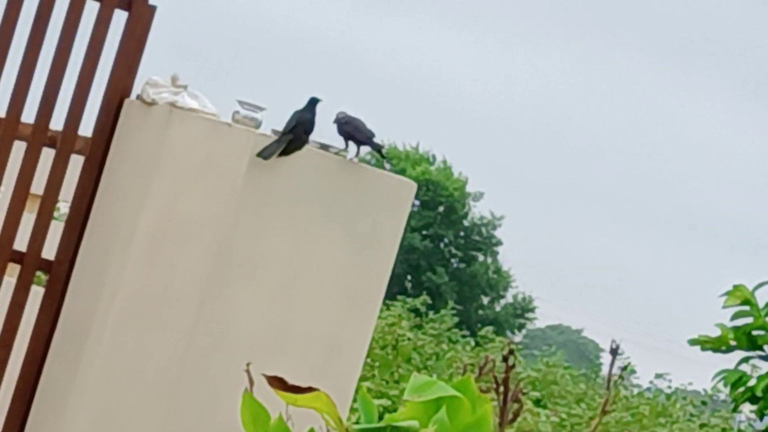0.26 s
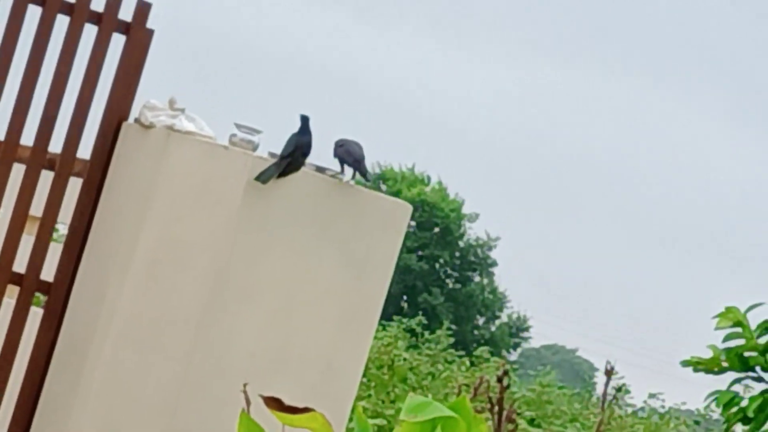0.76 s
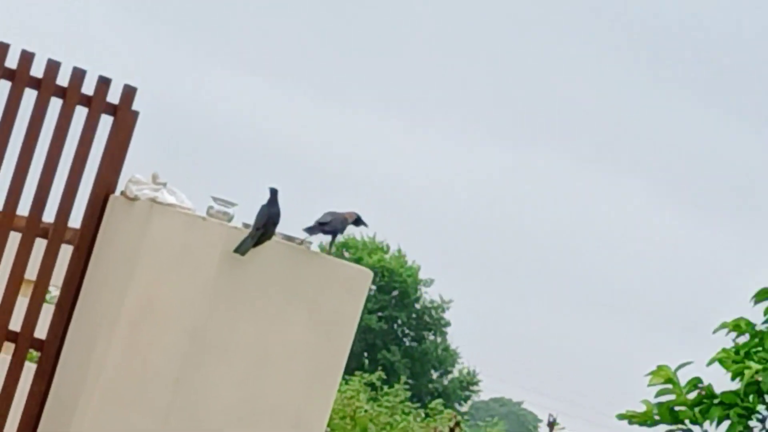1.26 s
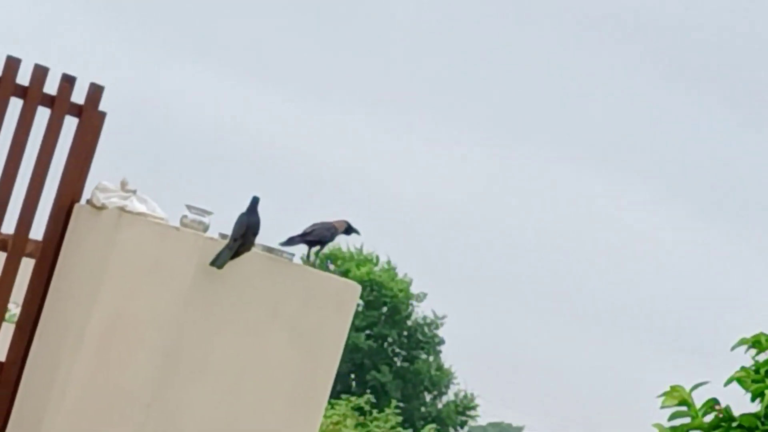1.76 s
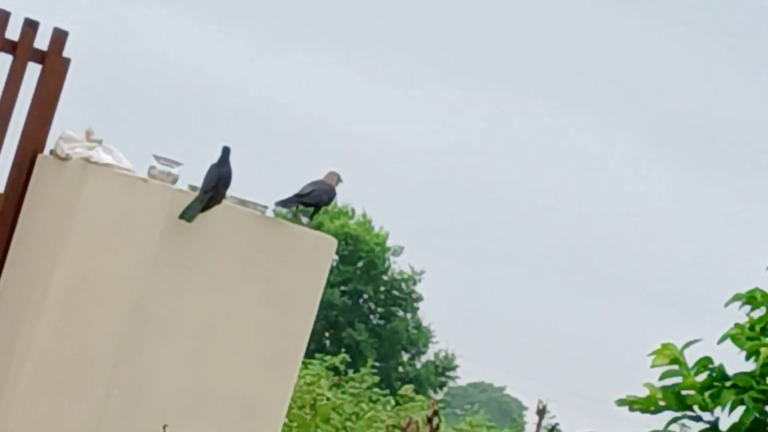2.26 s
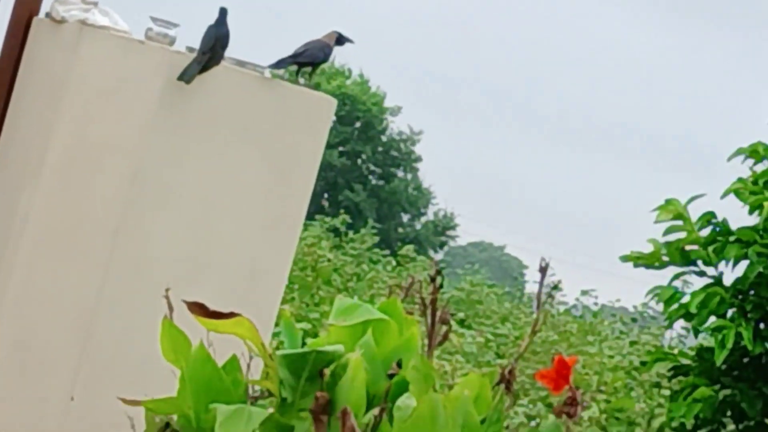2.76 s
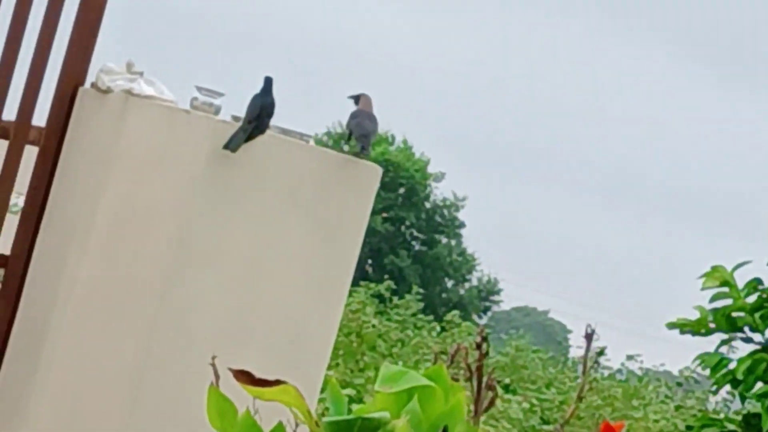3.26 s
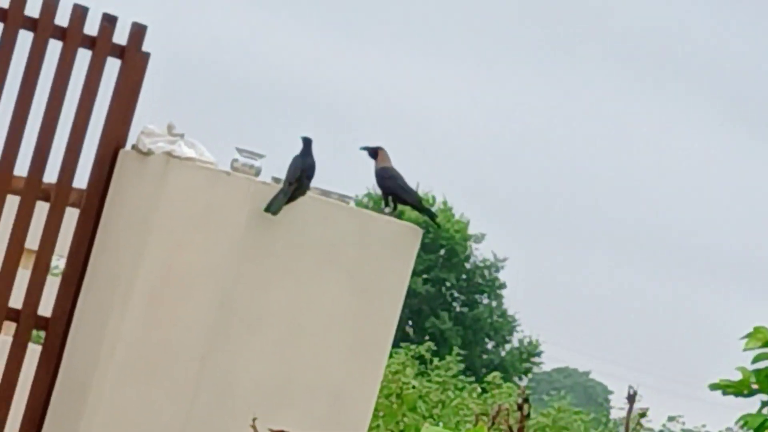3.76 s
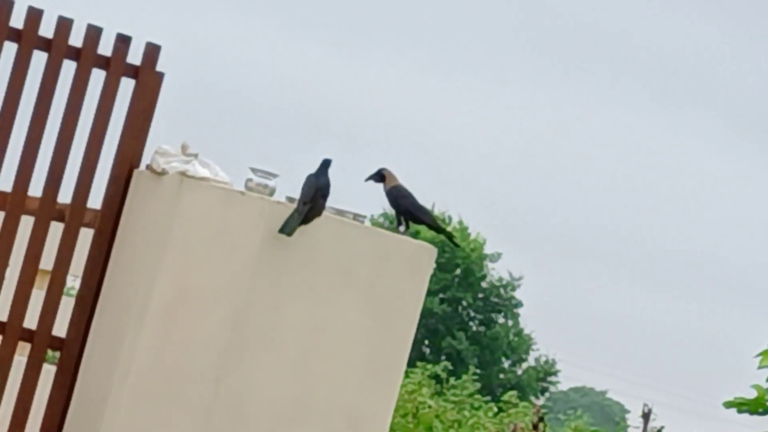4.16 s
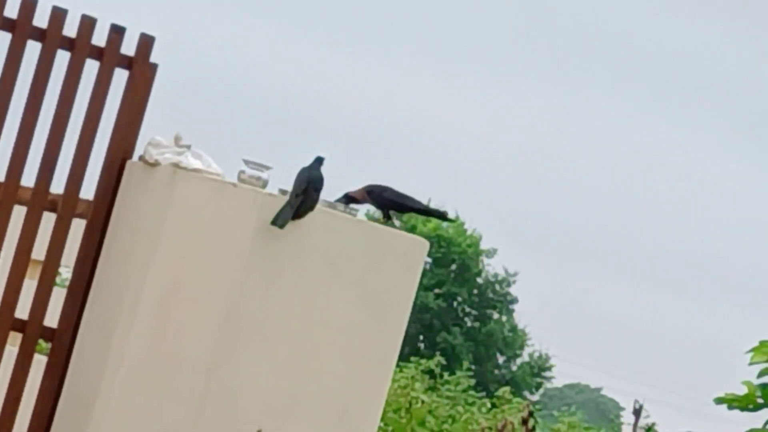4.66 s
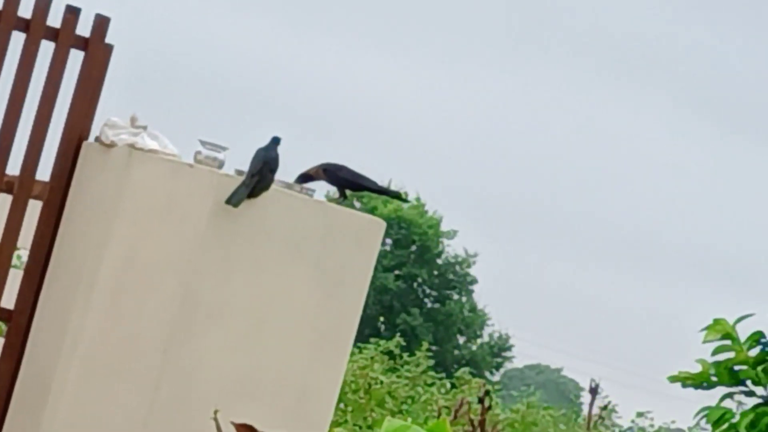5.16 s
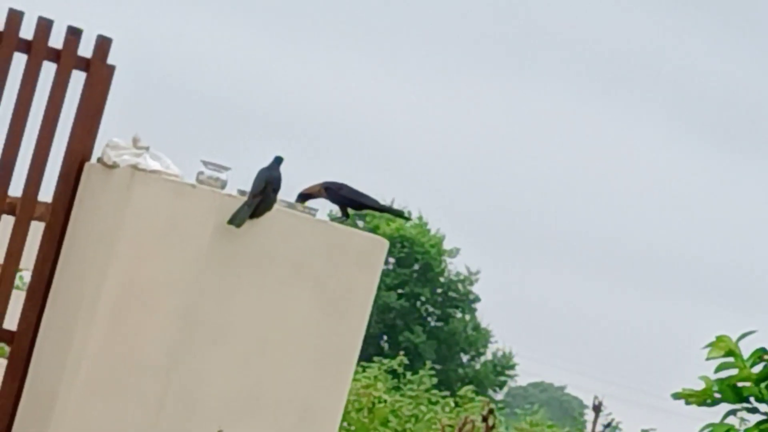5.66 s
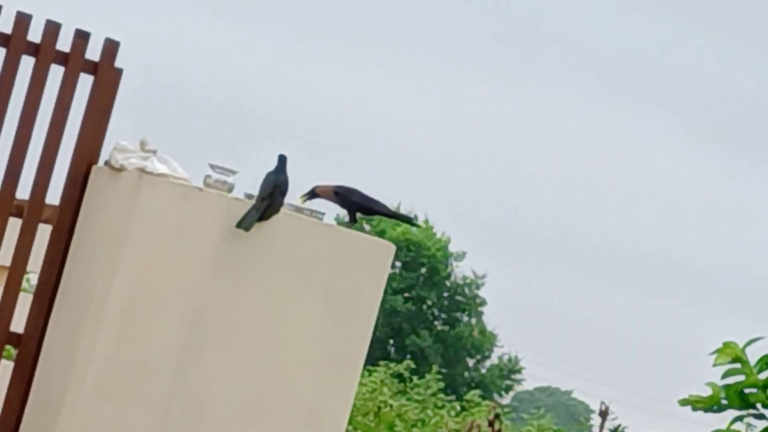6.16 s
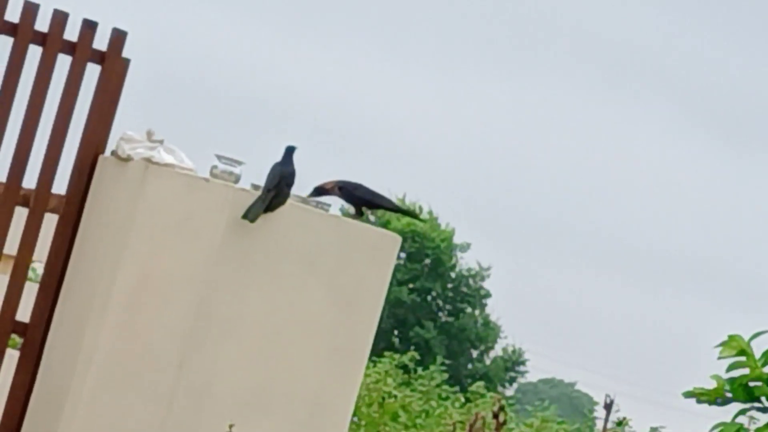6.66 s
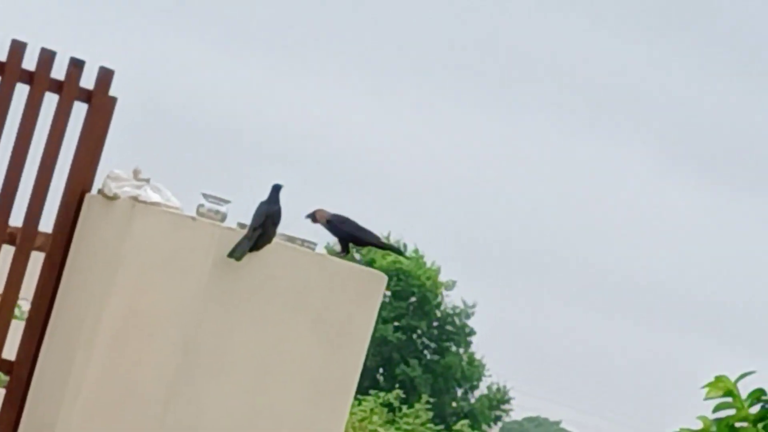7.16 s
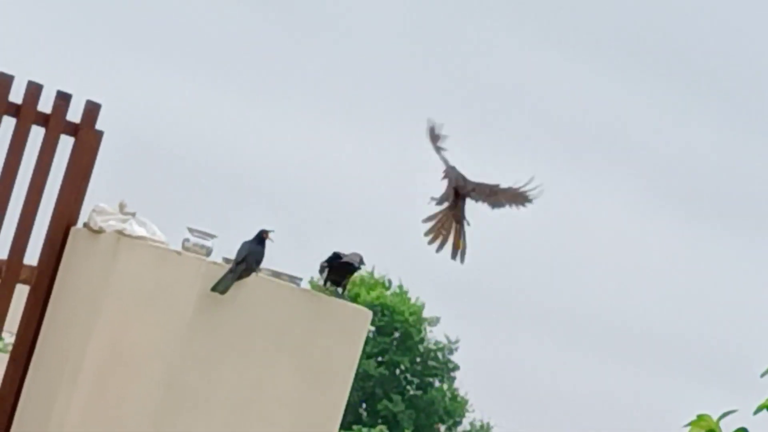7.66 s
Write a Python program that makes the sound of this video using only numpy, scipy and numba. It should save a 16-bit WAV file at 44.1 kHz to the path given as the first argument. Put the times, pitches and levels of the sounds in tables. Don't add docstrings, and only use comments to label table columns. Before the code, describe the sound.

A quiet, muffled start gives way to raspy crow calls from a wall and trees, clustered first around two seconds and again between four and five. Low gusts throb and knock against the phone microphone, then ease. The background drops to near silence before a growling caw, bright small-bird chirps, trilling insects and a final throbbing caw. Soft leaf hiss, with only a short yard echo.

```python
import sys
import numpy as np
from scipy import signal
from scipy.fft import rfft, irfft, next_fast_len
from scipy.io import wavfile
from scipy.ndimage import uniform_filter1d
from numba import njit

SR = 44100
rng = np.random.default_rng(int(sys.argv[2]) if len(sys.argv) > 2 else 0)


def dump_mix(stems):
    frames = np.atleast_2d(stems).T
    limited = np.clip(frames, -1, 1)
    pcm = np.round(limited * 32767).astype(np.int16)
    wavfile.write(sys.argv[1], SR, pcm)


def amplitude_ratio(level_db):
    exponent = np.asarray(level_db, float) / 20
    return 10 ** exponent


N = 348831
T = np.arange(N) / SR


def unit(x):
    return x / np.sqrt(np.mean(x ** 2) + 1e-30)


def colour(x, points):
    n = next_fast_len(len(x) + 4096, True)
    n += n % 2
    hz, db = np.transpose(points)
    log_f = np.log(np.arange(n // 2 + 1) * SR / n + 1)
    log_gain = np.interp(log_f, np.log(hz), db) * np.log(10) / 20
    cepstrum = irfft(log_gain, n)
    cepstrum[1:n // 2] *= 2
    cepstrum[n // 2 + 1:] = 0
    return irfft(rfft(x, n) * np.exp(rfft(cepstrum)), n)[:len(x)]


def band(x, lo_hz, hi_hz):
    return signal.sosfilt(signal.butter(4, [lo_hz, hi_hz], "band", fs=SR, output="sos"), x)


@njit
def svf(x, hz, width):
    y, b, l = np.empty(len(x)), 0., 0.
    for i in range(len(x)):
        g, k = np.tan(np.pi * hz[i] / SR), width / hz[i]
        v = (b + g * (x[i] - l)) / (1 + g * (g + k))
        b, l, y[i] = 2 * v - b, l + 2 * g * v, k * v
    return y


def walk(rate, size=N):
    k = int(SR / rate)
    steps = np.repeat(rng.standard_normal(size // k + 1), k)
    return unit(uniform_filter1d(uniform_filter1d(steps, k), k)[:size])


def effort(caw, manner, arc):
    start, length, top_hz, db, crest = caw
    attack, release, swell_db, fade_db = manner[:4]
    at = slice(int(start * SR), min(int((start + length) * SR), N))
    t, peak = T[at] - start, crest * length
    before = np.clip(1 - t / peak, 0, 1)
    after = np.clip((t - peak) / (length - peak), 0, 1)
    bend = 1.8
    throat_hz = top_hz * (1 - arc[0] * before ** bend - arc[1] * after ** bend)
    edge = np.interp(t, [0, attack, length - release, length], [1, 0, 0, 1])
    breath_db = db - 27 * edge ** 2
    push_db = np.interp(t, [attack, peak, length - release], [swell_db, 0, fade_db])
    return at, t, throat_hz, breath_db, push_db


def syrinx(caw, voice, arc, t, throat_hz):
    rate_hz, glide, jitter, breath = voice[:4]
    n, done = len(t), t / caw[1]
    middle_hz = caw[2] / round(caw[2] / rate_hz)
    wander = np.exp(jitter * (1 + 5 * arc[5] * done) * walk(rate_hz, size=n))
    hz = middle_hz * (throat_hz / throat_hz.max()) ** glide * wander
    phase = np.cumsum(hz / SR)
    wraps = np.diff(np.floor(phase), prepend=0)
    weak_db = arc[3] * (np.floor(phase) % 2)
    pulses = unit(wraps * amplitude_ratio(walk(rate_hz, size=n) + weak_db))
    puffs = unit(np.exp(-(phase % 1) / .5) * rng.standard_normal(n))
    share = np.clip(breath + arc[5] * done, 0, 1)
    source = unit(np.sqrt(1 - share) * pulses + np.sqrt(share) * puffs)
    scatter = rng.standard_normal(900) * np.exp(-np.arange(900) / (.003 * SR))
    spectrum = rfft(scatter)
    scatter = irfft(spectrum / np.abs(spectrum) ** .82)
    source = unit(signal.fftconvolve(source, scatter)[:n])
    growl_hz = 38
    growl = amplitude_ratio(arc[4] * np.cos(2 * np.pi * phase * growl_hz / rate_hz + walk(20, size=n)))
    return source, source * growl


def opening_bark(source, t):
    bark_s = .042
    bark = svf(source, 2620 + 2000 * np.exp(-t / bark_s), 450.0)
    snap = np.exp(-(2 * (t / bark_s - 1.2)) ** 2)
    settling = .18 * np.exp(-((t - .11) / .09) ** 2)
    return unit(band(bark, 2300, 4600)) * (snap + settling)


def crow(caws, upper, voice, manner, arc):
    width, skirt_db, echo = voice[4:]
    beak_db, rasp_db, press, bark_db = manner[4:]
    wing_hz, wing_s = 9.5, 7.62
    wall_lag = 210
    out = np.zeros(N)
    for caw in caws:
        at, t, throat_hz, breath_db, push_db = effort(caw, manner, arc)
        n = len(t)
        source, growling = syrinx(caw, voice, arc, t, throat_hz)
        skirt = unit(band(svf(growling, throat_hz, 440.0), 700, 2300))
        once = svf(source, throat_hz, width)
        throat = unit(unit(svf(once, throat_hz, width)) + amplitude_ratio(skirt_db) * skirt)
        open_beak = colour(growling, upper)
        beak, rasp = band(open_beak, 1500, 3300), band(open_beak, 3050, 5500)
        rasp = rasp + band(open_beak, 5500, 14000) * amplitude_ratio(-5 * np.exp(-t / 0.075))
        beak = beak / np.std(band(beak, 1900, 3000))
        rasp = rasp / np.std(band(rasp, 3100, 7500))
        throat_level_db = push_db + .8 * walk(21, size=n)
        wing_db = arc[2] * np.cos(2 * np.pi * wing_hz * (T[at] - wing_s))
        rasp_level_db = rasp_db + (1.5 + press) * push_db + wing_db + 0.72 * walk(35, size=n)
        call = throat * amplitude_ratio(throat_level_db) + beak * amplitude_ratio(beak_db + 0.4 * push_db)
        call = call + rasp * amplitude_ratio(rasp_level_db) + opening_bark(source, t) * amplitude_ratio(bark_db)
        call = call * amplitude_ratio(breath_db)
        call = call + echo * np.concatenate([np.zeros(wall_lag), call[:-wall_lag]])
        window = np.clip(np.minimum(t, caw[1] - t) / .02, 0, 1) ** .5
        out[at] += call * window / np.sqrt(1 + echo ** 2)
    return out


def near_crow():
    # (start t/s, length t/s, top throat resonance f/Hz, level/dB, crest as share of length 0-1)
    caws = [
        (.853, 0.4, 1440, -40.5, 0.51),
        (1.92, 0.393, 1511, -35, 0.48),
        (3.16, .305, 1424, -42.5, 0.6),
        (5.0, 0.39, 1510, -43.5, 0.38),
    ]
    # (f/Hz, gain/dB)
    upper = [(1060, -34.5), (1800, -6), (2340, -4), (2510, -4), (3860, -1), (5010, -10), (7110, -11.5),
             (8210, -17.5), (9230, -5.5), (9920, -13.5), (10800, -23.5), (13300, -30.5), (15400, -36)]
    # (pulse rate f/Hz, pitch glide 0-1, jitter 0-1, breath 0-1, throat width f/Hz, skirt level/dB, echo 0-1)
    voice = (480, 1, .048, .62, 200, -11.5, .37)
    # (attack t/s, release t/s, swell/dB, fade/dB, beak level/dB, rasp level/dB,
    # extra rasp with effort [dB per dB], opening bark level/dB)
    manner = (.045, .05, -4, -3, -13, 0.5, -.6, -40)
    # (pitch rise 0-1, sag 0-1, wing throb/dB, weak pulse/dB, growl/dB, breath gained by the end 0-1)
    arc = (.18, .07, 0, -1, .5, 0)
    return crow(caws, upper, voice, manner, arc)


def tree_crow():
    # (start t/s, length t/s, throat f/Hz, level/dB, crest 0-1)
    caws = [
        (1.81, 0.21, 1474, -39, 0.67),
        (2.872, .29, 1482, -41.5, .52),
        (5.53, .25, 1381, -62, 0.53),
    ]
    # (f/Hz, gain/dB)
    upper = [(1060, -16.5), (1800, 9), (2230, -1), (2340, 0), (3590, -2), (4540, -12), (4970, -8.5),
             (6220, -24), (8140, -31), (9480, -16.5), (11000, -42.5), (15400, -46.5)]
    voice, manner, arc = (480, 1, .036, .58, 150, -13, .1), (.06, .04, -3.5, -2, -13, -7, -.6, -40), (.2, .08, 0, -1, .5, 0)
    return crow(caws, upper, voice, manner, arc)


def gruff_crow():
    # (start t/s, length t/s, throat f/Hz, level/dB, crest 0-1)
    caws = [
        (1.58, .435, 1524, -30, .46),
    ]
    # (f/Hz, gain/dB)
    upper = [(1060, -23), (1800, 8.5), (2050, 6.5), (2300, 4), (2650, 1.5), (2950, -3.5), (3200, -21.5),
             (3700, -22), (4450, -31), (5430, -25), (7570, -36), (9480, -22), (11000, -28), (15400, -50)]
    voice, manner, arc = (191, 1, .009, .2, 340, -12, .05), (0.07, .09, -6.5, -6, -8, -30.5, -0.6, -10), (.26, .05, 0, -2, 1, .25)
    return crow(caws, upper, voice, manner, arc)


def far_crow():
    # (start t/s, length t/s, throat f/Hz, level/dB, crest 0-1)
    caws = [
        (4.88, 0.46, 1522, -33.5, .33),
    ]
    # (f/Hz, gain/dB)
    upper = [(1060, -22), (1800, 10), (2150, 3.5), (2700, 4.5), (3000, -13), (3300, -24), (3700, -21),
             (4450, -27), (5430, -19), (7570, -33), (9480, -23), (11000, -33.5), (15400, -50)]
    voice, manner, arc = (300, .6, .007, .18, 300, -13, .05), (0.08, 0.01, -10, -7, -7, -27.5, -0.9, -12), (.16, .05, 0, -3, 1, .6)
    return crow(caws, upper, voice, manner, arc)


def deep_crow():
    # (start t/s, length t/s, throat f/Hz, level/dB, crest 0-1)
    caws = [
        (6.41, .35, 1232, -34.5, .67),
    ]
    # (f/Hz, gain/dB)
    upper = [(940, -18), (1650, -16), (1900, -5), (2120, 9), (2400, 0), (2750, -9), (3100, -11),
             (3500, -20), (4800, -33), (5910, -27), (7860, -49), (9150, -18), (10800, -21), (15400, -46)]
    voice, manner, arc = (305, .5, .03, .48, 190, -11, .05), (0.18, 0.1, -6.5, -7.5, -6.5, -22.5, -0.1, -38), (.16, .05, 0, -2, 2.5, 0)
    return crow(caws, upper, voice, manner, arc)


def flying_crow():
    # (start t/s, length t/s, throat f/Hz, level/dB, crest 0-1)
    caws = [
        (7.495, .545, 1529, -41.5, .45),
    ]
    # (f/Hz, gain/dB)
    upper = [(1060, -51.5), (1800, -5), (2420, 2.5), (3110, -3), (3440, -5.5), (3760, 0), (5680, -22),
             (8900, -18.5), (14200, -40.5), (15400, -48)]
    voice, manner, arc = (530, .5, .08, .75, 300, -8, .1), (0.0846, 0.04, -3, -1.5, -11, 6, 1.5, -40), (.33, .02, 3.2, 0, 1, 0)
    return crow(caws, upper, voice, manner, arc)


def roof_crow():
    # (start t/s, length t/s, throat f/Hz, level/dB, crest 0-1)
    caws = [
        (4.222, .343, 1353, -43, .33),
    ]
    # (f/Hz, gain/dB)
    upper = [(1060, -23), (1800, 5), (2750, 4.5), (3280, 7), (3700, -2.5), (4000, -5.5), (4300, 2),
             (4750, -9), (5250, -2.5), (6560, -22.5), (8440, -25.5), (9400, -14.5), (11100, -38.5),
             (15400, -45.5)]
    voice, manner, arc = (540, .2, .05, .62, 130, -5, .05), (0.09, .03, -6.5, -2, -11.5, -5, -1, -40), (.25, .05, 0, -2, .5, 0)
    return crow(caws, upper, voice, manner, arc)


def arching_crow():
    # (start t/s, length t/s, throat f/Hz, level/dB, crest 0-1)
    caws = [
        (4.415, .375, 1449, -29, .42),
        (4.775, .13, 1363, -50, .3),
    ]
    # (f/Hz, gain/dB)
    upper = [(620, -58), (1060, -27.5), (1400, -2), (1570, -1.5), (2780, -26), (3000, -45.5), (9730, -57.5),
             (15400, -65.5)]
    voice, manner, arc = (360, 1, .024, .5, 130, -13, .05), (0.0755, 0.0852, -9.5, -10, -15, -30.5, -1, -43.5), (.24, .24, 0, -4, 3.5, 0)
    return crow(caws, upper, voice, manner, arc)


def songbirds():
    # (start t/s, length t/s, first f/Hz, last f/Hz, level/dB)
    low_bird = [(1.33, 0.119, 2586, 1770, -66.5), (1.453, 0.077, 2700, 2373, -63),
                (2.312, 0.058, 2720, 2700, -54.5), (2.375, 0.0177, 2427, 2180, -63),
                (2.46, 0.0534, 2530, 2290, -71), (2.545, 0.032, 2550, 2170, -63),
                (2.641, 0.022, 2310, 2045, -71.5), (2.686, 0.029, 2090, 1990, -68),
                (2.729, 0.0596, 2844, 2660, -63), (2.829, 0.071, 2730, 2170, -66),
                (3.49, 0.043, 2270, 2050, -67.5), (3.691, 0.077, 2720, 2640, -66.5),
                (3.713, 0.022, 2220, 2140, -66), (3.78, 0.042, 2184, 2050, -72),
                (4.002, 0.12, 2630, 2305, -71.5), (6.945, 0.137, 2720, 2600, -67.5)]
    # (start t/s, length t/s,
    # first f/Hz, last f/Hz, level/dB)
    high_notes = [(.28, 0.147, 3344, 2455, -75), (.61, 0.14, 3814, 3247, -65.5),
                  (.79, 0.094, 4415, 3425, -71), (1.4, 0.032, 5100, 4820, -70),
                  (2.82, 0.032, 5050, 5000, -75), (6.04, 0.082, 4120, 3950, -78.5),
                  (6.3, 0.11, 4100, 4346, -90), (6.84, 0.027, 3650, 3443, -71),
                  (7.06, 0.122, 3755, 3080, -65), (7.34, 0.093, 3660, 3404, -78),
                  (7.429, 0.068, 3523, 2980, -63.5), (7.355, 0.091, 3150, 2500, -73),
                  (7.4, .09, 4440, 4250, -73.5), (7.495, 0.077, 3078, 2940, -59)]
    # (start t/s, length t/s, f/Hz at both ends, middle f/Hz, level/dB)
    arched = [
        (0.716, 0.1015, 2085, 2520, -66),
        (2.818, 0.072, 4440, 4000, -67.5),
        (6.917, 0.031, 6190, 6110, -44.5),
        (6.96, 0.0525, 6140, 5890, -58),
        (7.013, 0.027, 5980, 5970, -53.5),
        (7.05, 0.073, 6050, 6220, -83),
    ]
    slide_left = 0.35
    notes = [(s, n, a, b + slide_left * (a - b), b, db) for s, n, a, b, db in low_bird + high_notes]
    notes += [(s, n, a, b, a, db) for s, n, a, b, db in arched]
    buzz_hz, flutter_db = 55, 3.5
    out = np.zeros(N)
    for start, length, first_hz, middle_hz, last_hz, db in notes:
        u = np.arange(int(length * SR)) / (length * SR)
        curve = np.polyfit([0, .5, 1], [first_hz, middle_hz, last_hz], deg=2)
        hz = np.polyval(curve, u) + buzz_hz * walk(1500, size=len(u))
        shape = np.sin(np.pi * u) ** .6 * amplitude_ratio(flutter_db * walk(70, size=len(u)))
        a = int(start * SR)
        out[a:a + len(u)] += amplitude_ratio(db) * np.sqrt(2) * shape * np.sin(2 * np.pi * np.cumsum(hz) / SR)
    return out


def chirps():
    # (start t/s, length t/s, first f/Hz, last f/Hz, level/dB)
    buzzes = [
        (6.896, .03, 3000, 6100, -53),
        (6.905, .047, 6300, 6700, -48),
        (6.896, .042, 3250, 3520, -55),
        (6.995, .05, 5700, 6500, -58),
        (7.33, .18, 3300, 3700, -66),
    ]
    out = np.zeros(N)
    for start, length, first_hz, last_hz, db in buzzes:
        u = np.arange(int(length * SR)) / (length * SR)
        hz = np.interp(u, [0, 1], [first_hz, last_hz])
        buzz = svf(svf(rng.standard_normal(len(u)), hz, 1250.), hz, 1250.)
        a = int(start * SR)
        out[a:a + len(u)] += amplitude_ratio(db) * unit(buzz) * np.sin(np.pi * u ** .7) ** .5
    return out


def yard_echo(birds):
    t60_s, level_db = 0.34, -15.5
    n = SR // 2
    tail = svf(rng.standard_normal(n), np.full(n, 3600.), 5100.0) * amplitude_ratio(-60 * T[:n] / t60_s)
    return signal.fftconvolve(birds, tail / np.linalg.norm(tail))[:N] * amplitude_ratio(level_db + background_db())


def trill(times, hz, width, rate_hz, sharp):
    strokes = (.5 + .5 * np.cos(2 * np.pi * rate_hz * T)) ** sharp
    centre = np.full(N, hz)
    hiss = unit(svf(svf(strokes * rng.standard_normal(N), centre, width), centre, width))
    level = np.zeros(N)
    for start, length, db in times:
        level += amplitude_ratio(db) * np.clip(np.minimum(T - start, start + length - T) / 0.013, 0, 1)
    return hiss * level


def insects():
    # (start t/s, length t/s, level/dB)
    low_trill = [
        (.28, 0.69, -77.5),
        (.51, 0.031, -76.5),
        (.6, 0.064, -72),
        (1.45, 0.33, -83),
        (3.44, 0.1205, -70),
        (3.9, 0.49, -83.5),
        (5.96, 0.18, -99),
        (7.07, 0.15, -70.5),
        (7.23, 0.129, -67),
        (7.35, 0.12, -81),
    ]
    # (start t/s, length t/s, level/dB)
    high_trill = [
        (.28, 0.15, -78),
        (.41, 0.247, -77),
        (6.98, 0.332, -66),
    ]
    return trill(low_trill, 6980.0, 470.0, 110, 1.0) + trill(high_trill, 8910.0, 510.0, 98.6, 2.2)


def gust_db():
    # (t/s, level/dB)
    breeze = [(0, -66), (.23, -82), (.5, -49.5), (1.1, -48.5), (1.47, -46.5), (1.57, -23), (1.92, -17),
              (2.3, -23.5), (2.47, -28.5), (3.3, -36.5), (4.2, -37.5), (4.6, -44), (5.1, -51.5),
              (5.42, -64), (6.45, -68), (6.55, -48.5), (6.86, -35), (7.36, -42.5), (7.85, -75)]
    # (arrival t/s, level/dB, hold t/s)
    gusts = [(0.287, -48, 0.092), (0.547, -34, 0.042), (0.628, -30.5, 0.108), (0.815, -31.5, 0.0094),
             (1.038, -47, 0.0025), (1.233, -27, 0.12), (2.336, -20.5, 0.0046), (2.526, -24, 0.047),
             (2.646, -22, 0.0203), (2.82, -33, 0.08), (3.519, -23.5, 0.02), (3.671, -33, 0.174),
             (4.027, -31.5, 0.036), (4.265, -32.5, 0.0087), (4.89, -43.5, 0.1267), (5.184, -45.5, 0.029),
             (5.969, -46, 0.012), (6.633, -28.5, 0.053), (6.751, -23, 0.052), (6.931, -29, 0.023),
             (7.063, -28.5, 0.011), (7.492, -27, 0.0184), (7.726, -33, 0.0056), (7.9, -26.5, .05)]
    rise, fall = 401.5, 168
    t = T[::64]
    power = amplitude_ratio(2 * np.interp(t, *np.transpose(breeze)))
    for s, db, hold in gusts:
        below_db = rise * np.clip(s - t, 0, 1) + fall * np.clip(t - s - hold, 0, 1)
        power = power + amplitude_ratio(2 * (db - below_db))
    return np.interp(T, t, 10 * np.log10(power))


def buffets():
    # (t/s, peak level/dB, ring f/Hz, snap level/dB)
    eddies = [(0.615, -22, 187.6, -43), (1.249, -28, 190, -57.5), (1.553, -22.5, 97.6, -43),
              (1.592, -23.5, 121.5, -38), (1.665, -14, 239, -27), (1.754, -12, 117, -27.5),
              (1.805, -18, 134, -22.5), (1.844, -34, 166.2, -30), (1.903, -11.5, 151.8, -19),
              (1.934, -18, 117.9, -20.5), (1.949, -22, 180, -19), (2.024, -20, 105, -17.5),
              (2.044, -11, 133.9, -28.5), (2.094, -23, 116, -26.5), (2.172, -23, 96, -28.5),
              (2.229, -26.5, 106, -31.5), (2.261, -14, 116.6, -23), (2.326, -29, 116, -33),
              (2.353, -12, 98.4, -21.5), (2.637, -17.5, 123.9, -37.5), (2.533, -18.5, 149.2, -32.5),
              (2.548, -21, 169.5, -34.5), (2.657, -18, 129.4, -26.5), (3.533, -18, 104.4, -57),
              (3.668, -30, 91, -62.5), (4.239, -27.5, 123.6, -71), (6.677, -27, 181, -58),
              (6.782, -18.5, 119.9, -57), (7.059, -19.5, 173, -55.5), (7.497, -37, 90, -69),
              (.545, -29, 89.8, -56), (.828, -29, 79.9, -67), (1.214, -30.5, 85.3, -48.5),
              (1.291, -29, 109.3, -44.5), (2.895, -23, 129, -63), (3.0, -29.5, 100, -51),
              (3.182, -27.5, 120.6, -62.5), (3.358, -29, 89.94, -62), (3.502, -20, 97, -60),
              (4.03, -32, 102, -68), (4.132, -28.5, 93.3, -59.5), (4.391, -33, 101, -62.5),
              (4.755, -35.5, 79.4, -69), (4.851, -37, 88.4, -67), (4.952, -36, 102.4, -72),
              (6.935, -27, 84.2, -58), (7.135, -30, 94, -62), (7.3, -33.5, 84.5, -66),
              (7.423, -33.5, 86.7, -66.5), (7.9, -28.5, 111.1, -64)]
    out = np.zeros(N)
    t = np.arange(-1500, 1500) / SR
    for s, db, hz, snap_db in eddies:
        a = int(s * SR) - 1350
        thump = amplitude_ratio(db + 5.0) * np.exp(-(t * hz / 0.774) ** 2) * np.cos(2 * np.pi * hz * t + 0.49)
        u = np.abs(t) / 0.00059
        snap = amplitude_ratio(snap_db + 11.0) * (1 + u) * np.exp(-u) * np.sin(2 * np.pi * 300 * t)
        out[a:a + len(t)] += (thump + snap)[:N - a]
    return out


def wind():
    # (f/Hz, gain/dB)
    wind_colour = [(13, -53), (22, -21.5), (32, -18.5), (50, -7.5), (68, 4), (140, 3.5), (199, -6),
                   (354, -17), (457, -28), (511, -33), (1000, -53.5), (1300, -76.5), (2200, -120)]
    level_db = gust_db()
    throb = amplitude_ratio(4.0 * np.tanh(walk(22)))
    rumble = colour(throb * rng.standard_normal(N), wind_colour)
    slow_power = uniform_filter1d(uniform_filter1d(rumble ** 2, size=4000), size=4000)
    rumble = rumble / np.sqrt(slow_power)
    upper_db = 0.18 * (level_db + 23.5)
    body = unit(band(rumble, 41, 99.73)) + amplitude_ratio(upper_db) * unit(band(rumble, 110.5, 240.3))
    edge = band(rumble * throb, 240, 1500)
    edge = edge / np.std(band(edge, 260, 600))
    edge_db = -18.0 + 1.03 * (level_db + 28.0)
    return amplitude_ratio(level_db - 3.5 + 2.1 * walk(14)) * (body + amplitude_ratio(edge_db) * edge) + buffets()


def background_db():
    # (start t/s, end t/s, gain/dB)
    spells = [
        (0.272, 0.47, -0.7),
        (0.48, 0.89, 2),
        (.85, 3.55, 4),
        (3.55, 4.23, 3),
        (4.25, 5.44, 3.5),
        (5.501, 6.9, -10.5),
        (5.95, 6.05, -9),
        (6.49, 6.95, -.5),
        (6.95, 8.9, 3.5),
    ]
    quiet_db, slew_s = -18.5, 0.12
    db = np.full(N, quiet_db)
    for spell_start, spell_end, gain_db in spells:
        db += (T > spell_start) * (T < spell_end) * (gain_db - quiet_db)
    return uniform_filter1d(db, int(slew_s * SR))


def garden():
    # (f/Hz, gain/dB)
    leaf_colour = [(290, -34), (500, -0.5), (758, 0.5), (1490, -6), (2680, -5.5), (3570, -13.5),
                   (4490, -16), (5810, -23.5), (6900, -15.5), (7850, -23.5), (8930, -13.5), (11600, -26.5),
                   (15400, -27.5)]
    hiss = unit(colour(rng.standard_normal(N), leaf_colour)) * amplitude_ratio(.7 * walk(1.9))
    town = amplitude_ratio(-5.5) * unit(band(rng.standard_normal(N), 190, 460))
    cricket = amplitude_ratio(-19.0) * unit(band(rng.standard_normal(N), 6960, 7180))
    return (hiss + town + cricket) * amplitude_ratio(-67.5 + background_db())


def scene():
    birds = near_crow() + tree_crow() + gruff_crow() + far_crow()
    birds += deep_crow() + flying_crow() + roof_crow() + arching_crow()
    birds += songbirds() + chirps()
    return (birds + yard_echo(birds) + insects() + wind() + garden())[None]


def band_limit(x):
    return signal.sosfilt(signal.butter(12, 15550, fs=SR, output="sos"), x)


def record(dry):
    return band_limit(dry)


dry = scene()
out = record(dry)
dump_mix(out)
```